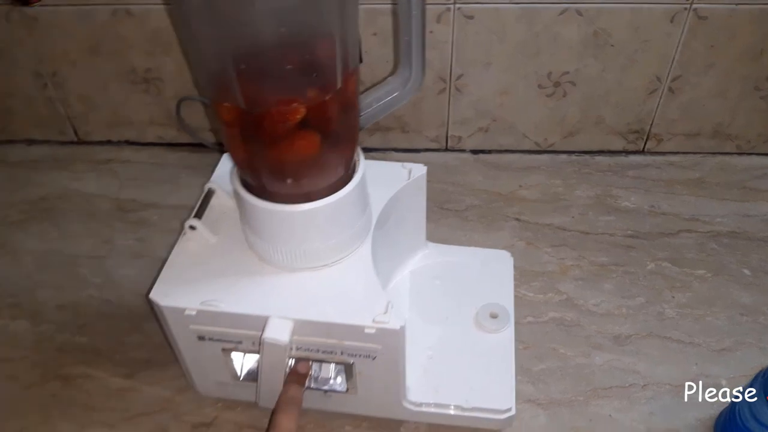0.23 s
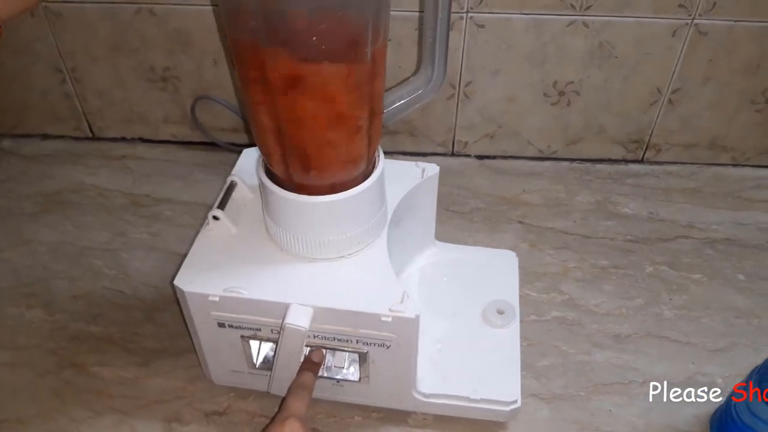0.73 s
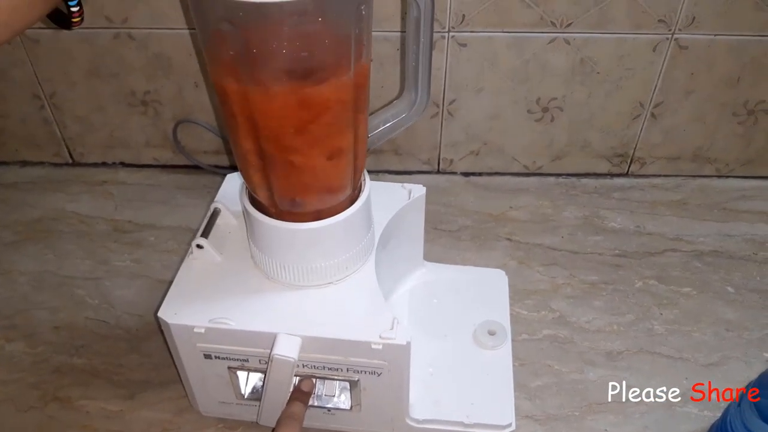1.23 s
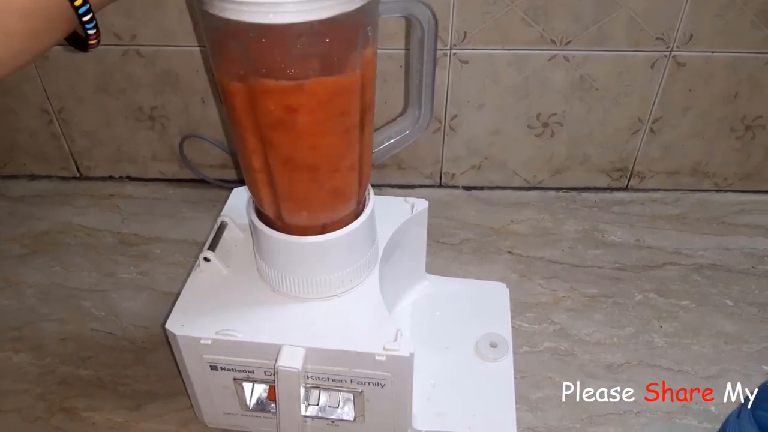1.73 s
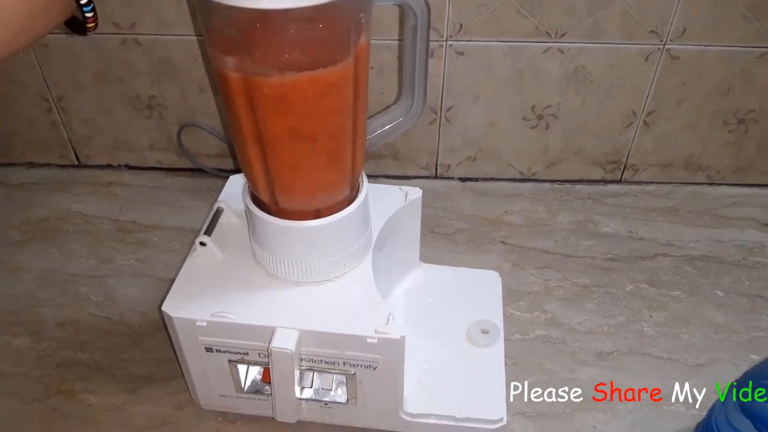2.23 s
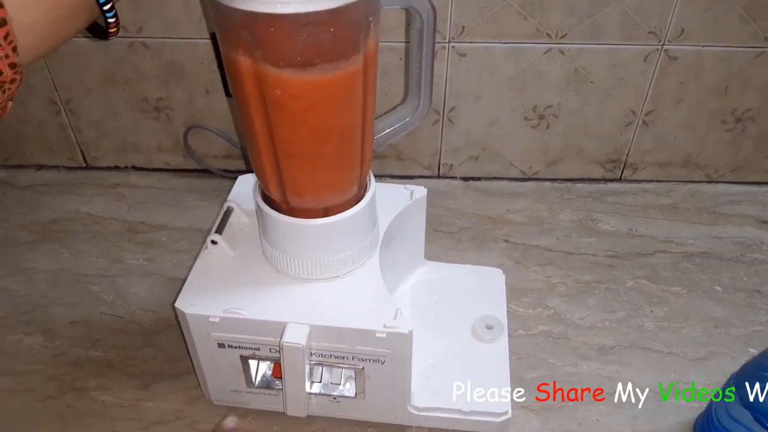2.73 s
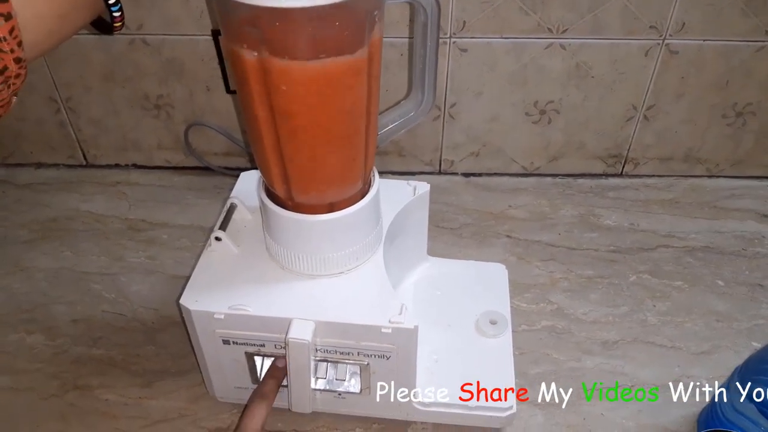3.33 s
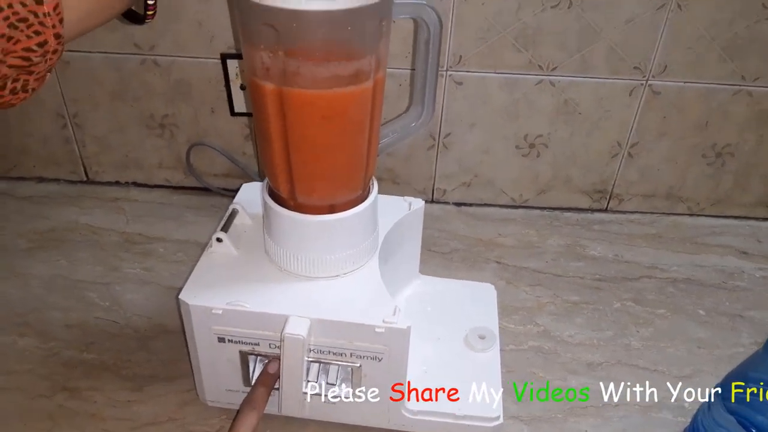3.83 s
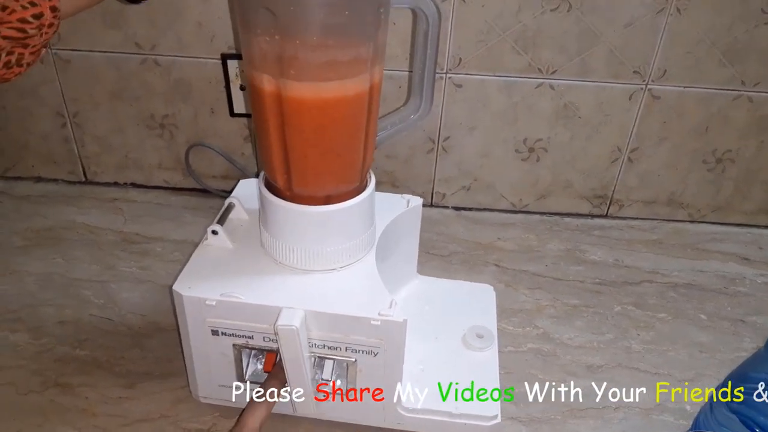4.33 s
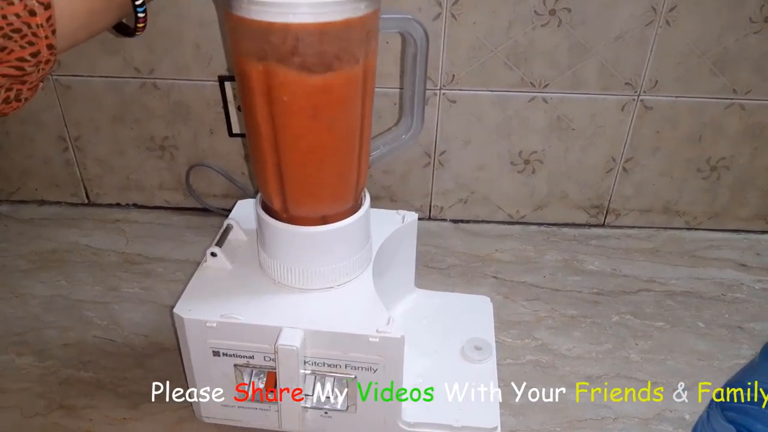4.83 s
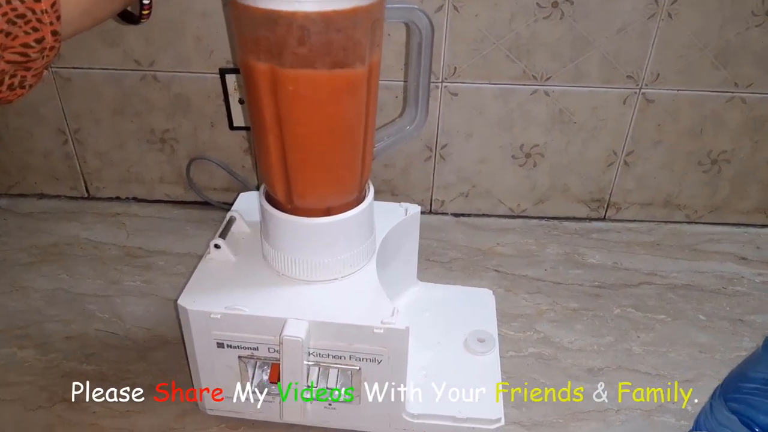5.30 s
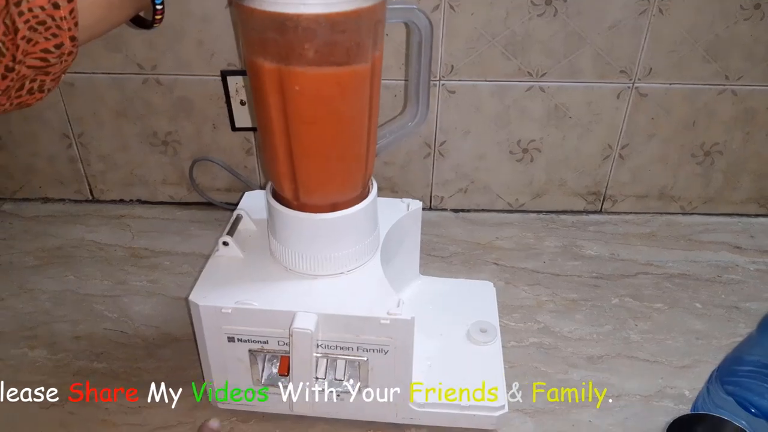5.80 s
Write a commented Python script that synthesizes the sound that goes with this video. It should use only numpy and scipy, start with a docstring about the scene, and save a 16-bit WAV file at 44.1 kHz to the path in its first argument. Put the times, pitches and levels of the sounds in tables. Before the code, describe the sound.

A nearby blender starts roughly, with fruit pieces thumping and cracking against the jug. The rattle suddenly gives way to a bright, even whine and the rush of swirling puree. The power cuts and the pitch falls as the loose coupling clatters and squeaks. After two small switch clicks, the motor bangs back into motion and runs on at a lower speed. Quiet kitchen air lies underneath.

```python
"""A jug blender chops fruit with a knocking, rumbling rattle; then the scene changes to a high, smooth whir.
Impacts of the pieces excite the resonances of the jug; the shaft radiates harmonics of its rotation frequency
over the turbulent noise of the puree. Switched off, it coasts down with a clattering coupling and faint
squeaks. The switch clicks twice, and the motor restarts with a jolt and settles at a lower speed. Quiet kitchen
air and an electrical hum lie underneath."""
import sys
import numpy as np
from scipy import signal
from scipy.fft import rfft, irfft
from scipy.io import wavfile
from scipy.ndimage import uniform_filter1d

SR = 44100
rng = np.random.default_rng(int(sys.argv[2]) if len(sys.argv) > 2 else 0)


def pcm_store(signal):
    """Save signal as 16-bit PCM."""
    levels = np.round(np.clip(np.atleast_2d(signal), -1, 1) * 32767)
    wavfile.write(sys.argv[1], SR, levels.astype(np.int16).T)


N = 267270
T = np.arange(N) / SR
FREQS = np.maximum(np.arange(N // 2 + 1) * SR / N, 1)
SIDES = np.array([[1], [-1]])  # left, right
CHOP_ON, BITE, WHIR_ON, WHIR_OFF, RESTART = 0.189, 0.287, 1.458, 3.315, 4.48  # t/s
HUM_HZ = 353


def undb(db):
    """Amplitude ratio of a level in decibels."""
    return 10 ** (np.asarray(db) / 20)


def unit(x):
    """Normalisation to rms 1."""
    return x / np.sqrt(np.mean(x ** 2))


def across(table):
    """Interpolation of each column over log frequency, one value a bin."""
    hz, *columns = np.transpose(table)
    return [np.interp(np.log(FREQS), np.log(hz), c) for c in columns]


def walk(rate):
    """Low-pass random fluctuation: values held for 1 / rate seconds and smoothed twice; rms 1."""
    k = max(int(SR / rate), 1)
    held = np.repeat(rng.standard_normal(N // k + 1), k)[:N]
    return unit(uniform_filter1d(uniform_filter1d(held, k), k))


def between(start, end, fade=0.0033):
    """Gate with short linear ramps."""
    return np.clip((T - start) / fade, 0, 1) * np.clip((end - T) / fade + 1, 0, 1)


def approach(start, first, last, lag_s):
    """First-order relaxation from first to last, beginning at start."""
    return last + (first - last) * np.exp(-np.maximum(T - start, 0) / lag_s)


def change(middle, takes_s):
    """Smooth transition from 0 to 1."""
    return 0.5 + 0.5 * np.tanh(2 * (T - middle) / takes_s)


def blow(start, t60, rise=0.0012):
    """Impact envelope: a quick rise, then exponential decay by 60 dB in t60."""
    out = np.zeros(N)
    sounding = slice(int(start * SR) + 1, int((start + 2 * t60) * SR))
    age = T[sounding] - start
    out[sounding] = (1 - np.exp(-age / rise)) * np.exp(-np.log(1000) * age / t60)
    return out


def lows(x, hz, order=4):
    """Zero-phase low-pass filter."""
    return irfft(rfft(x) / (1 + (FREQS / hz) ** (2 * order)), N)


def angle(hz, wobble):
    """Phase as the integral of a frequency that wavers with the sloshing load."""
    return 2 * np.pi * np.cumsum(hz * (1 + wobble * walk(35))) / SR


def rough_tone(hz, width):
    """Narrow-band noise: one resonance under random excitation."""
    phase = 2 * np.pi * hz * T
    return walk(2 * width) * np.cos(phase) + walk(2 * width) * np.sin(phase)


# Stereo fields of the chopping and of all else: f/Hz, correlation, left minus right/dB
CHOP_FIELD = [(150.4, 1, -1), (600, 0.63, 0.5), (1100, 0.65, -0.5), (1700, 0.62, -2.5), (2430, 1, -6),
              (3780, 0.17, -2), (4730, 0.26, -6), (6080, 0.00059, 2), (7940, -0.27, -7), (9500, 0.29, 2.5),
              (12550, -0.38, -14), (15000, 0.03, -16)]
MAIN_FIELD = [(300, 0.97, -1), (1000, 0.95, -2), (1660, 0.23, 1), (2380, 0.53, 1.5), (3800, 0.39, 0),
              (4800, -0.16, 0), (5940, 0.43, -1.5), (6300, 0.0091, -3), (7300, 0.53, -2),
              (8500, 0.077, -3.5), (13100, -0.31, -1)]


def ring(drive, spectrum, peaks=(), field=MAIN_FIELD, lag_s=0):
    """Source and filter: dense tiny impacts of strength drive excite a resonant body; stereo, rms 1."""
    resonances_db = sum(lift / (1 + (2 * (FREQS - hz) / width) ** 2) for hz, width, lift in peaks)
    response = undb(across(spectrum)[0] + resonances_db)
    correlation, pan_db = across(field)
    correlation = np.clip(correlation, -0.99, 0.99)
    mid, side = rfft(rng.standard_normal((2, N)) * drive)
    mid, side = mid * np.sqrt(1 + correlation), side * np.sqrt(1 - correlation)
    left, right = undb(pan_db / 2), undb(-pan_db / 2)
    delay = np.exp(-2j * np.pi * FREQS * lag_s)
    channels = np.array([(mid + side) * left, (mid - side) * right * delay])
    return unit(irfft(channels * response / np.hypot(left, right), N))


# Spectra of the room air and of a dull rumble or thud: f/Hz, level/dB
ROOM_SPECTRUM = [(40, -35.5), (120, -28), (200, -18.5), (290, -15), (400, -5), (650, -18), (950, -12),
                 (2000, -20.5), (4000, -31), (8000, -35.5), (15000, -42)]
THUD_SPECTRUM = [(40, -34), (110, 4.5), (300, 4), (850, -1.5), (1500, -25), (4000, -39), (15000, -45.5)]


def kitchen():
    """Ambient noise and electrical hum, low and rumbling at first and higher from the whir on."""
    air = ring(undb(1.1 * walk(12)), ROOM_SPECTRUM) * undb(-61)
    low_hum = sum(undb(db) * np.sin(2 * np.pi * hz * T) for hz, db in [(109, -67.5), (296, -65.5)])
    hum = np.sin(2 * np.pi * HUM_HZ * T) * undb(-56.5 + 2 * walk(16))
    rumble = lows(ring(1, THUD_SPECTRUM), 400) * undb(-57.5)
    return air + np.where(T < WHIR_ON, low_hum + rumble, hum)


# Squeaks as the shaft runs down and rests: t/s, f/Hz, bandwidth/Hz, level/dB, half duration/s
SQUEAK_NOTES = [(3.503, 3070, 230, -43.5, 0.04), (4.255, 2500, 150, -62, 0.09),
                (4.31, 1890, 115, -55, 0.095), (4.32, 2700, 360, -68, 0.12)]


def squeaks():
    """Narrow-band squeaks swell and die away; wall reflections add an incoherent part on each side."""
    out = np.zeros((2, N))
    for start, hz, width, db, half_s in SQUEAK_NOTES:
        progress = np.clip((T - start) / (2 * half_s), 0, 1)
        swell = np.sin(np.pi * np.sqrt(progress)) ** 4
        walls = np.array([rough_tone(hz, width), rough_tone(hz, width)])
        out += undb(db) * swell * (rough_tone(hz, width) + 2.2 * walls)
    return out


# Spectrum of the snap: f/Hz, level/dB
SNAP_SPECTRUM = [(80, -50), (200, -34), (700, 11.5), (1400, 11), (2200, 6), (3000, 4), (5000, -1.5),
                 (8000, 2), (14000, -25)]
# Resonances of the switch spring: f/Hz, bandwidth/Hz, gain/dB
SPRING_MODES = [(2960, 260, 9), (3950, 350, 5), (8000, 900, 4.5)]
# Strokes on the rocker: t/s, level/dB, T60/s, share of snap
SWITCH_STROKES = [(.091, -31.5, 0.04, 0), (0.121, -41.5, 0.07, 0), (4.124, -40.5, 0.22, 1),
                  (4.225, -48, 0.18, 1)]


def switch():
    """Impact excitation of a plastic rocker: a finger thuds on it, or it snaps over and rings briefly."""
    snap = ring(1, SNAP_SPECTRUM, SPRING_MODES)
    thud = ring(1, THUD_SPECTRUM)
    out = np.zeros((2, N))
    for start, db, t60, share in SWITCH_STROKES:
        strike = 0.85 * blow(start, t60) + 3.2 * blow(start, t60=0.02, rise=0.00043)
        out += undb(db) * strike * (share * snap + (1 - share) * thud)
    return out


# Slugs of pulp thrown against the jug wall: t/s, level/dB, f/Hz, T60/s
PULP_SLUGS = [(0.198, -27, 97, 0.26), (0.352, -25.5, 105, 0.21), (0.355, -18.5, 192, 0.24),
              (0.405, -19.5, 240, 0.41), (0.53, -22, 288, 0.21), (0.665, -22, 312, 0.38),
              (0.735, -14.5, 262, 0.17), (0.795, -19.5, 258, 0.2), (1.008, -21.5, 272, 0.15)]


def thumps():
    """Damped oscillation: each slug booms in the jug at a pitch that wavers as the load shifts."""
    return sum(undb(db) * blow(start, t60, rise=0.013) * np.sin(angle(hz, wobble=0.03))
               for start, db, hz, t60 in PULP_SLUGS)


# Spectra of a crack on the jug and of a tick on a blade: f/Hz, level/dB
CRACK_SPECTRUM = [(1500, -11), (3500, 1), (6200, 2), (7700, 5), (9000, -24), (15000, -5)]
BLADE_SPECTRUM = [(5000, -30), (9000, -12), (12000, -1), (15500, 0)]
# Impacts of hard bits: t/s, level/dB, T60/s, share of blade tick
HARD_IMPACTS = [(0.195, -29.5, 0.082, 0), (0.237, -22.5, 0.12, .4), (0.257, -16.5, .04, 0.64),
                (0.272, -21, .006, 1), (0.436, -37, .04, .1), (0.585, -22, 0.037, 0.2),
                (0.653, -26, .04, 0.34), (0.824, -20.5, .04, 0.05), (0.9656, -22, .008, .95),
                (1.042, -24, .006, 1), (1.072, -17.5, 0.034, 0.35), (1.077, -21, .02, 0.6),
                (1.2739, -18, .007, .9), (1.359, -26, .007, 1)]


def ticks():
    """Short contacts radiate high frequencies: hard bits crack on the jug or tick on a blade."""
    crack = ring(1, CRACK_SPECTRUM, field=CHOP_FIELD)
    tick = ring(1, BLADE_SPECTRUM, field=CHOP_FIELD)
    return sum(undb(db) * blow(start, t60, rise=0.0003) * (share * tick + (1 - share) * crack)
               for start, db, t60, share in HARD_IMPACTS)


def knocking(rows, t60, rise, low_ratio, low_db, pan_db, skew_rad):
    """Free vibration: each knock rings a mode and a weaker, lower one, out of phase left and right."""
    out = np.zeros((2, N))
    age = T[:int(2 * t60 * SR)]
    envelope = blow(0, t60, rise)[:len(age)]
    for start, db, hz in rows:
        turn, low_turn, skew = rng.standard_normal(3)
        phase = 2 * np.pi * hz * age + SIDES * skew_rad * skew
        modes = np.sin(phase + np.pi * turn) + undb(low_db) * np.sin(low_ratio * phase + np.pi * low_turn)
        first = int(start * SR)
        out[:, first:first + len(age)] += undb(db) * envelope * modes
    return out * undb(SIDES * pan_db / 2)


# Firm pieces striking the jug wall: t/s, level/dB, f/Hz
WALL_IMPACTS = [(0.293, -7.5, 994), (0.308, -14.5, 1520), (0.352, -19, 1500), (0.511, -13, 1640),
                (0.598, -22, 1590), (0.645, -22, 1620), (0.685, -17, 1700), (0.709, -11, 2370),
                (0.745, -23, 1600), (0.759, -22, 1530), (0.817, -9, 1580), (0.833, -16, 1660),
                (0.942, -9.5, 1720), (1.012, -20, 1940), (1.062, -14, 1680), (1.081, -16, 1610),
                (1.229, -15.5, 1560), (1.265, -11, 1660), (1.281, -18, 1500), (1.374, -16, 1640),
                (1.390, -22, 1690), (1.447, -22, 1710)]


def jug_knocks(patter_per_s=95):
    """Modal ringing of the jug, struck by firm pieces amid a random patter of small ones."""
    count = int(patter_per_s * (WHIR_ON - BITE))
    size, pitch, delay = rng.standard_normal((count, 3)).T
    times = np.linspace(BITE, WHIR_ON, count) + delay / (2 * patter_per_s)
    levels_db = -24 + 3 * size
    pitches_hz = 1710 * np.exp(0.13 * pitch)
    rows = WALL_IMPACTS + list(zip(times, levels_db, pitches_hz))
    return knocking(rows, t60=0.037, rise=0.0031, low_ratio=0.566, low_db=-11, pan_db=-2.5, skew_rad=0.29)


# Spectrum of the chopping noise: f/Hz, level/dB
CHOP_SPECTRUM = [(40, -36), (100, -24.5), (170, -9), (280, 0), (460, -10), (950, 0), (1300, -4), (1650, 0),
                 (2400, -0.5), (3500, -12), (4800, -11), (7600, -20), (9000, -36.5), (12000, -23.5),
                 (15500, -24)]
# Resonances of housing and jug: f/Hz, bandwidth/Hz, gain/dB
CHOP_MODES = [(94.4, 13, 10), (247, 8.3, -2), (286, 3.5, 2.5), (526.5, 21, 7), (1604, 130, 4.5),
              (4740, 310, 6.5), (5810, 250, 4.5)]
# Pieces caught and ground by the blades: t/s, level/dB, f/Hz, T60/s
CAUGHT_PIECES = [(0.286, -18.5, 1050, 0.23), (0.297, -28, 1800, 0.17), (0.338, -22, 1844, 0.16),
                 (0.424, -21, 1700, 0.098), (0.558, -22, 1650, 0.17), (0.574, -23.5, 1568, 0.24),
                 (0.64, -17.5, 1607, 0.23), (0.677, -20.5, 1700, 0.2), (0.700, -16, 2344, 0.13),
                 (0.744, -20, 1570, 0.24), (0.804, -13.5, 1583, 0.14), (0.918, -20, 1760, .1),
                 (0.996, -21.5, 1550, 0.18), (1.057, -16.5, 1656, 0.13), (1.067, -15, 1664, 0.088),
                 (1.362, -19, 1614, 0.12)]
# Contour of the blade tone: t/s, level/dB
BLADE_TONE = [(0.47, -32), (0.502, -33), (0.602, -35), (0.66, -41), (0.74, -33.5), (0.9, -38), (0.924, -46),
              (1.154, -36.5), (1.29, -41), (1.45, -39)]


def chopping(nominal_hz=179, drag_hz=18):
    """Forced vibration: the blades beat fruit against the jug; whole fruit slows them and adds noise."""
    whole = 1 - change(0.88, takes_s=0.24)
    clear = 1 - change(BITE, takes_s=0.065)  # the blades spin almost clear before they bite
    spin = approach(CHOP_ON, 0.56, 0.99, lag_s=0.0707)
    shaft = angle(spin * (nominal_hz - drag_hz * whole), wobble=0.025)
    drive = undb(0.39 * walk(900) + 1.2 * walk(89.3) + 0.29 * np.cos(shaft))
    jug = ring(drive, CHOP_SPECTRUM, CHOP_MODES, CHOP_FIELD, lag_s=0.00011)
    bass, pulp, body = lows(jug, 470), lows(jug, 1390, order=6), lows(jug, 7550, order=8)
    # each caught piece swells the upper three bands and rings one mode of the jug
    hits = [undb(db) * blow(start, t60, rise=0.0095) for start, db, _, t60 in CAUGHT_PIECES]
    caught = np.sqrt(sum(hit ** 2 for hit in hits))
    ringing = undb(-2) * sum(hit * rough_tone(hz, 420) for hit, (_, _, hz, _) in zip(hits, CAUGHT_PIECES))
    rumble = unit(bass) * undb(-36.5 + 5 * whole - 4 * (1 - spin))
    slap = unit(pulp - bass) * np.hypot(undb(-34.5 + 3.5 * whole - 0.96 * clear), undb(-4.5) * caught)
    rattle = unit(body - pulp) * np.hypot(undb(-28 + whole - 4 * clear), caught)
    # the brushes hiss, and spark harder until the motor is up to speed
    spark_db = approach(CHOP_ON, 0, 6.525, lag_s=0.018) * (1 - change(0.39, takes_s=0.14))
    hiss = unit(jug - body) * np.hypot(undb(-36.5 + spark_db), undb(-21) * caught)
    tone_db = np.interp(T, *np.transpose(BLADE_TONE)) + 2 + 0.88 * walk(40)
    tone = np.sin(shaft) * undb(tone_db) * change(0.44, takes_s=0.069)
    impacts = thumps() + ticks() + jug_knocks()
    return (rumble + slap + rattle + hiss + ringing + tone + impacts) * between(CHOP_ON, WHIR_ON)


# Spectrum of the loose coupling: f/Hz, level/dB
COUPLING_SPECTRUM = [(200, -50), (600, -13), (920, -0.5), (1300, -10), (1800, -14), (3000, -17),
                     (6000, -28), (9000, -24), (15000, -27)]
# Its resonances: f/Hz, bandwidth/Hz, gain/dB
COUPLING_MODES = [(887, 55, 4.5), (940, 61, 1), (1050, 59, 8), (1390, 65, 13), (3080, 280, 3),
                  (5770, 500, 4)]
# Its distinct knocks: t/s, level/dB, f/Hz
COUPLING_IMPACTS = [(3.382, -30, 1160), (3.465, -21.5, 904), (3.561, -22, 926), (3.582, -25, 950),
                    (3.598, -24, 1037), (3.636, -26, 915), (3.648, -23, 932), (3.673, -34, 940),
                    (3.739, -27.5, 910), (3.779, -32, 925), (3.826, -30.5, 844)]


def loose_coupling(shaft, speed_share, coasting_s):
    """Backlash: free of torque, the coupling rattles once a turn until too slow to be thrown."""
    drive = undb(2 * np.sqrt(speed_share) * np.cos(shaft) + walk(110))
    loose = np.minimum(coasting_s / 0.23, 1) ** 2 * np.minimum(speed_share / 0.16, 1)
    rattle = ring(drive, COUPLING_SPECTRUM, COUPLING_MODES) * undb(-28.5) * speed_share * loose
    return rattle + knocking(COUPLING_IMPACTS, t60=0.063, rise=0.0032,
                             low_ratio=0.84, low_db=-11, pan_db=-1, skew_rad=0.15)


# Spectrum of the meshing coupling: f/Hz, level/dB
MESH_SPECTRUM = [(150, -88), (350, -8), (600, -1), (900, 2), (1300, -2.5), (1800, -8), (3200, -6),
                 (4300, -10.5), (5200, -20), (8000, -17), (15000, -27)]
# Its resonances: f/Hz, bandwidth/Hz, gain/dB
MESH_MODES = [(852, 41, 8.5), (1030, 55, 6), (1230, 21, 12)]
# Its blows as the motor takes hold: t/s, level/dB, T60/s
MESH_IMPACTS = [(4.4874, -17.5, 0.31), (4.532, -29, 0.62), (4.564, -23, 0.11)]


def jolt(shaft):
    """Transient response of the coupling as it bangs into mesh."""
    blows = sum(undb(db) * blow(start, t60) for start, db, t60 in MESH_IMPACTS)
    return ring(undb(2 * np.cos(shaft)), MESH_SPECTRUM, MESH_MODES) * blows


# Radiation efficiency of the housing: f/Hz, level/dB
RADIATION = [(120, -70), (300, -40), (345, -7.5), (420, -6), (490, -2), (546, 6.5), (610, 0), (900, 1.5)]
# Scattering by the swirling puree: harmonic number, relative scattered power
SCATTERING = [(2, 0.022), (3, 0.4), (4, 0.26), (6, 0.2), (8, 0.07), (12, 0.08), (16, 0.63)]


def whine(shaft, hz, levels_db, ripple, fade_db, overtone_gain, rough):
    """Harmonic series of blades and armature, radiated by the housing and scattered by the puree."""
    out = np.zeros((2, N))
    slack = 1 - hz / hz.max()  # below top speed the overtones weaken and scatter more
    for order, db in enumerate(levels_db, 1):
        housing_db = np.interp(order * hz, *np.transpose(RADIATION))
        overtone = overtone_gain * undb(-fade_db * slack * np.log(order / 2)) if order > 2 else 1
        scattered = np.clip(rough * np.interp(order, *np.transpose(SCATTERING)) + 0.72 * slack, 0, 1)
        flutter_hz = 22 + 7 * order
        swirl = np.sqrt(1 - scattered) + np.sqrt(scattered / 2) * (walk(flutter_hz) + 1j * walk(flutter_hz))
        tone = undb(db + housing_db) * overtone * swirl * np.exp(1j * order * shaft)
        skew = 0.14 * np.sqrt(order) * walk(14)  # changing paths to left and right
        out += tone.imag + SIDES * tone.real * skew
    bearing_chatter = undb(8 * np.sqrt(slack) * walk(120))
    torque_ripple = 1 + ripple * np.cos(np.pi * HUM_HZ * T)  # the supply adds sidebands to each harmonic
    return out * bearing_chatter * torque_ripple


# Noise spectrum at low speed: f/Hz, level/dB
SLOW_SPECTRUM = [(100, -27), (280, -22.5), (550, -3), (850, 1), (1300, 2), (2100, -8.5), (3000, -3.5),
                 (4400, -7), (5300, -3), (6500, -4), (7400, -3), (8700, -10.5), (11500, -14.5),
                 (15500, -13)]
# Resonances of housing and jug: f/Hz, bandwidth/Hz, gain/dB
SLOW_MODES = [(777, 8.4, 15), (848, 53, 4.2), (946, 28, 13), (1016, 11.3, 16), (1378, 13, 13),
              (2803, 50, 6.2), (6000, 270, 1.8), (7220, 160, 7)]
# Shaft harmonics from the first up: level/dB
SLOW_HARMONICS = [-25, -2.5, -11, -1.5, -12, -4, -32, 0, -25, -8, -11, -9, -27, -24, -23, -22, -8, -7.5, -8,
                  -3.5, -14, -20, -12, -8.5, -8]


def slow_run(from_hz=125, top_hz=298.1):
    """Starting transient: inrush current hums, and the motor winds up exponentially to its lower speed."""
    hz = approach(RESTART, from_hz, top_hz, lag_s=0.11)
    shaft = angle(hz, wobble=0.002413)
    drive = undb(0.37 * walk(1200) + 0.32 * walk(60) + 1.2 * np.cos(2 * shaft))
    flow = ring(drive, SLOW_SPECTRUM, SLOW_MODES)
    low_flow = lows(flow, 1680)
    churn = unit(low_flow) * undb(-38.5)
    rush = unit(flow - low_flow) * undb(-31) * approach(RESTART, 0.31, 0.95, lag_s=0.075)
    # the puree closes into a whirl that lifts the noise and the upper harmonics
    whirl = undb(1.5 * change(5, takes_s=0.096))
    held_db = 6.5 * (1 - change(4.94, takes_s=0.22))
    levels_db = [db - held_db if order > 4 else db for order, db in enumerate(SLOW_HARMONICS, 1)]
    push_db = 32 * np.minimum(1 - hz / hz.max(), 0.35)  # the blades push hardest while accelerating
    tones = whine(shaft, hz, levels_db, ripple=0.31, fade_db=49, overtone_gain=0.94, rough=0.73)
    tones *= undb(-40.5 + push_db)
    inrush = undb(-25.5) * blow(RESTART, t60=0.34, rise=0.017) * np.sin(2 * np.pi * HUM_HZ * T)
    running = (churn + rush) * whirl + tones + inrush + jolt(shaft)
    base_cut = signal.butter(4, 223, "high", fs=SR, output="sos")  # the base radiates little bass
    return signal.sosfilt(base_cut, running * between(RESTART, np.inf, fade=0.0016))


# Noise spectrum at full speed: f/Hz, level/dB
FAST_SPECTRUM = [(100, -47.5), (300, -28.5), (550, -19.5), (850, -5.5), (1150, -4.5), (1700, -11.5),
                 (2300, -10.5), (2900, -6), (4600, -7.5), (5700, 1), (6700, -4.5), (7400, -6.5),
                 (9500, -10.5), (13000, -15), (15500, -11)]
# Resonances of housing and jug: f/Hz, bandwidth/Hz, gain/dB
FAST_MODES = [(543, 20, 15.4), (854, 36, 5.7), (4340, 90, 2.5), (5640, 76, 6.5), (6420, 230, 3.7),
              (7100, 170, 3.9), (7540, 220, 3.7), (8340, 140, 6)]
# Shaft harmonics from the first up, the even ones strong from the two blades: level/dB
FAST_HARMONICS = [-32.5, -0.24, -7, -4, -17.5, -11.5, -14, -10.5, -27, -23, -17, -5.5, -25.5, -23, -19.5,
                  -4, -21.5, -13, -13, -5.5, -5]
# Thin whistle of the twelfth harmonic: t/s, gain/dB
WHISTLE_GAIN = [(1.5, 0), (2.0, -1), (2.3, -1.5), (2.55, -1), (2.72, 0), (2.88, -4.5), (3.0, 3.5),
                (3.12, 0), (3.3, -1), (3.35, -12)]
# Last hard bits ticking in the whirl: t/s, level/dB
LAST_BITS = [(1.4586, -23), (1.482, -23), (1.539, -26.5), (1.565, -28), (1.6204, -23), (1.6845, -25)]


def fast_run(from_hz=321.5, top_hz=351.3, friction_hz=161.1, brake_s=0.61):
    """Rotor tones and flow noise: speed rises as the puree thins; unpowered, drag and friction brake it."""
    coasting_s = np.maximum(T - WHIR_OFF, 0)
    powered_hz = approach(WHIR_ON, from_hz, top_hz, lag_s=0.33)
    hz = np.maximum((powered_hz + friction_hz) * np.exp(-coasting_s / brake_s) - friction_hz, 0)
    speed_share = hz / powered_hz
    shaft = angle(hz, wobble=0.00226 + 0.0566 * (1 - hz / hz.max()))
    drive = undb(walk(1200) + 0.68 * walk(60) + np.cos(2 * shaft))
    flow = ring(drive, FAST_SPECTRUM, FAST_MODES)
    low_flow = lows(flow, 1720)
    bits = sum(undb(db) * blow(start, t60=0.13) for start, db in LAST_BITS)
    churn = unit(low_flow) * np.hypot(undb(-40.5) * speed_share, undb(-12) * bits)
    rush = unit(flow - low_flow) * np.hypot(undb(-27) * speed_share ** 1.88, bits)
    # overtones grow by 3 dB/s as the puree gets smoother, and drop once the power is off
    smoothing_db = 1.5 + 3 * np.minimum(T - WHIR_OFF, 0)
    overtones = undb(smoothing_db) * (0.31 + 0.47 * np.exp(-coasting_s / 0.083))
    whistle_db = np.interp(T, *np.transpose(WHISTLE_GAIN))
    levels_db = [db + whistle_db if order == 12 else db for order, db in enumerate(FAST_HARMONICS, 1)]
    lumps = approach(WHIR_ON, 4.9, 1, lag_s=0.43)
    freeing = approach(WHIR_ON, 0.42, 0.86, lag_s=0.058)  # the tones swell as the blades run free
    tones = whine(shaft, hz, levels_db, ripple=0.032, fade_db=12, overtone_gain=overtones, rough=lumps)
    tones *= undb(-32.5) * speed_share * freeing
    clatter = loose_coupling(shaft, speed_share, coasting_s)
    return (churn + rush + tones + clatter) * between(WHIR_ON, RESTART)


def scene():
    """Linear superposition of the blender and the kitchen, in stereo."""
    return chopping() + fast_run() + slow_run() + switch() + squeaks() + kitchen()


def record(dry):
    """Band limiting by a steep low-pass filter at 15.8 kHz."""
    return signal.sosfilt(signal.ellip(10, 0.2, 80, 15800, fs=SR, output="sos"), dry)


dry = scene()
out = record(dry)
pcm_store(out)
```